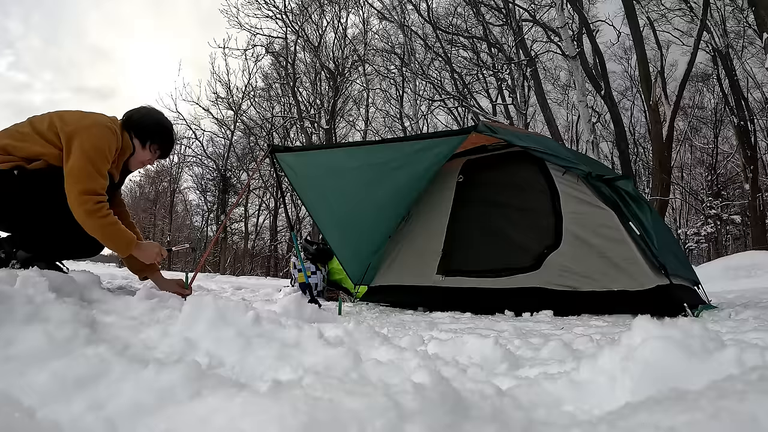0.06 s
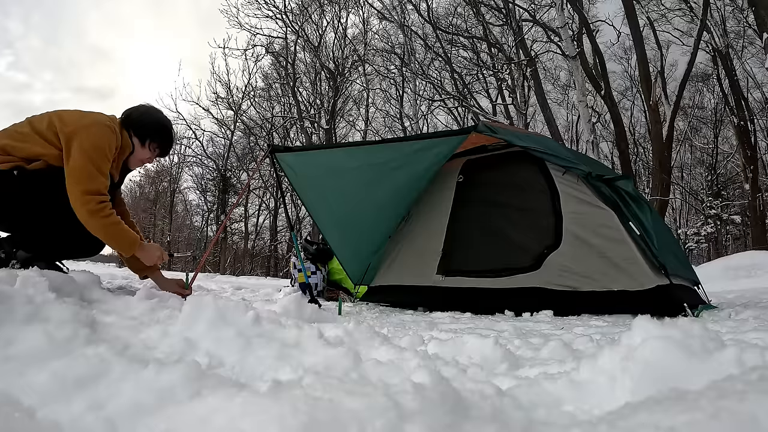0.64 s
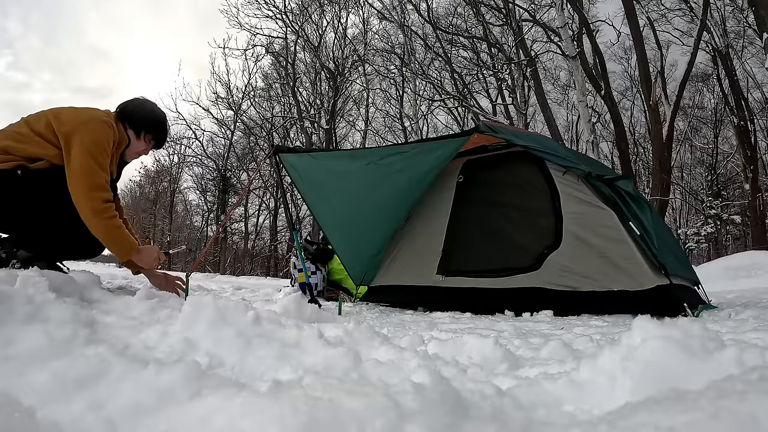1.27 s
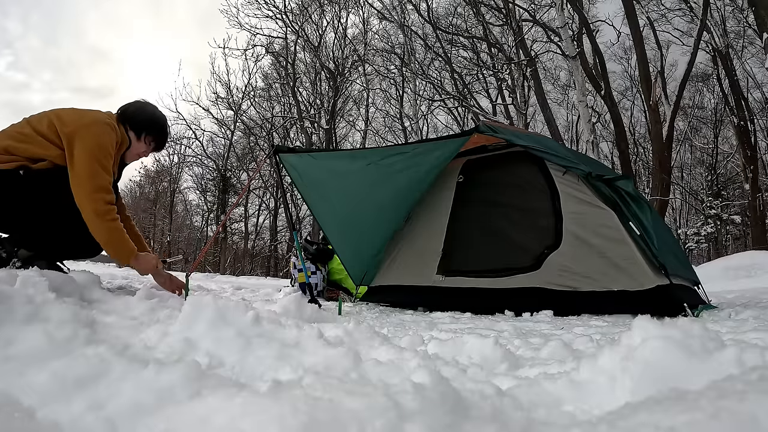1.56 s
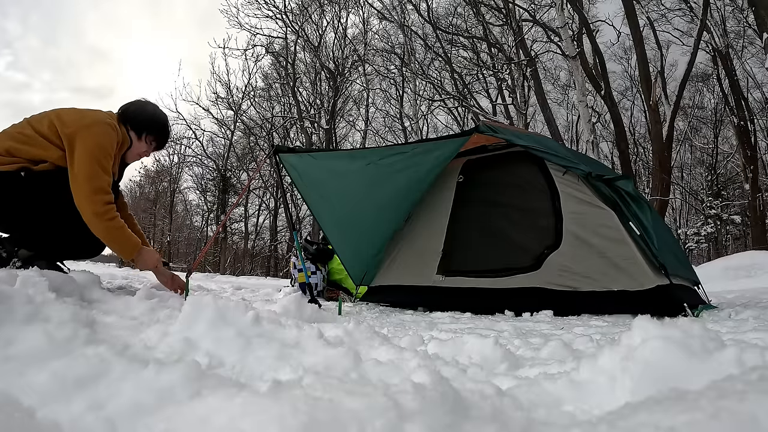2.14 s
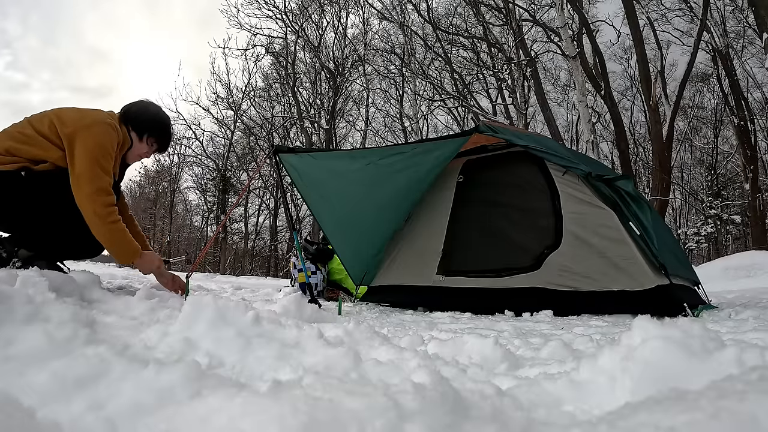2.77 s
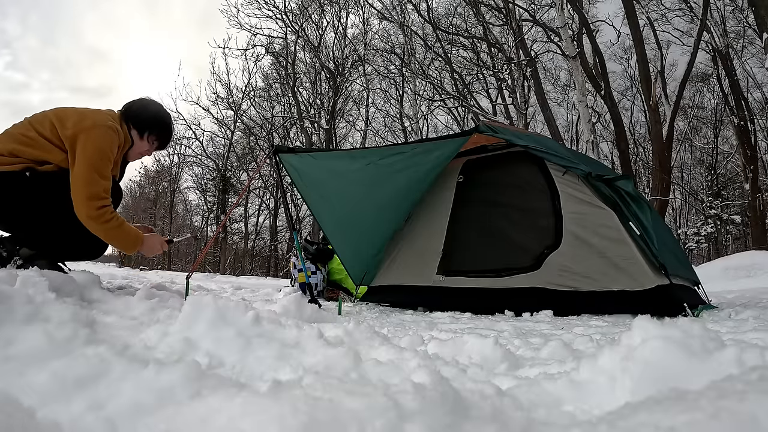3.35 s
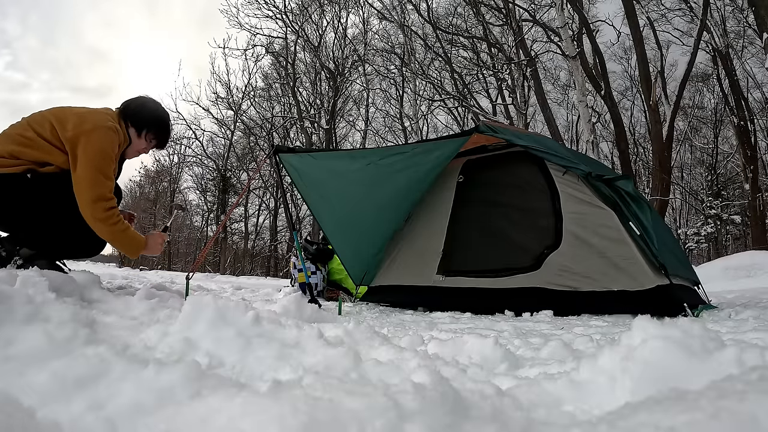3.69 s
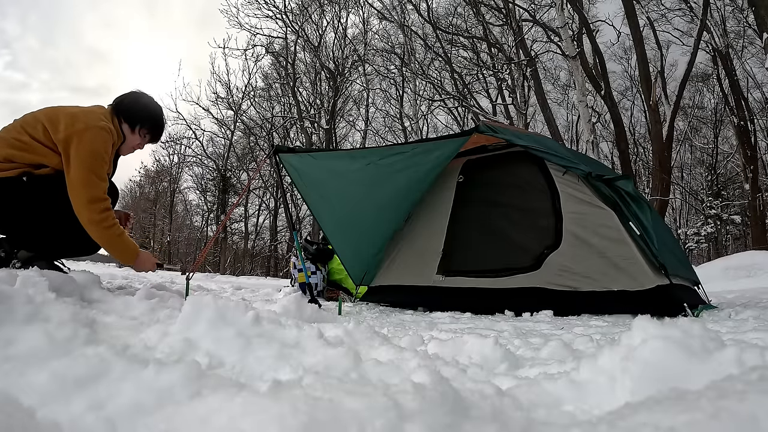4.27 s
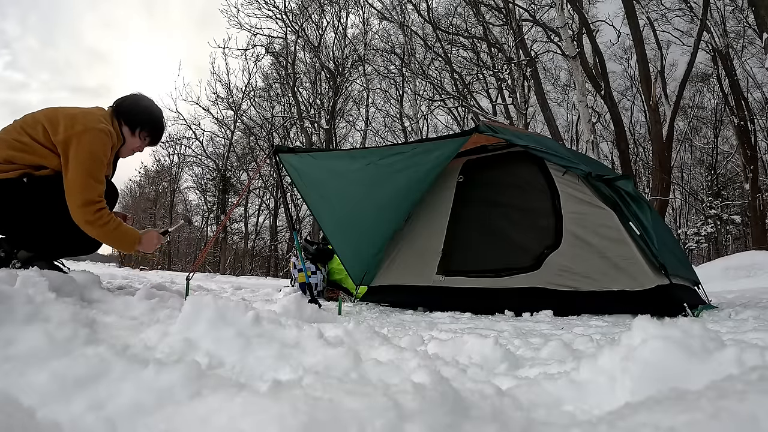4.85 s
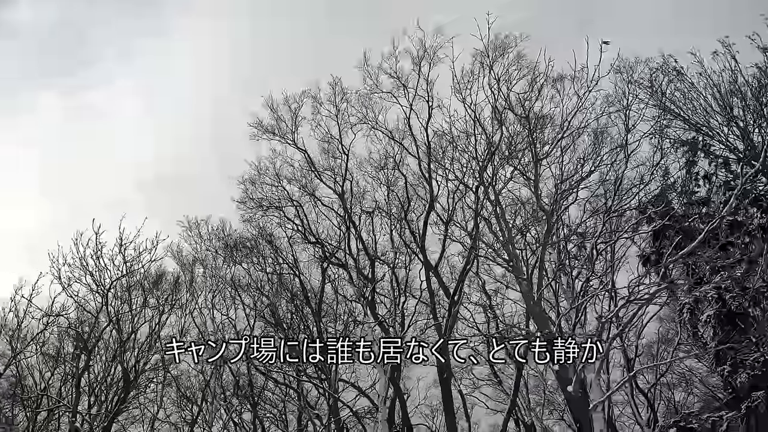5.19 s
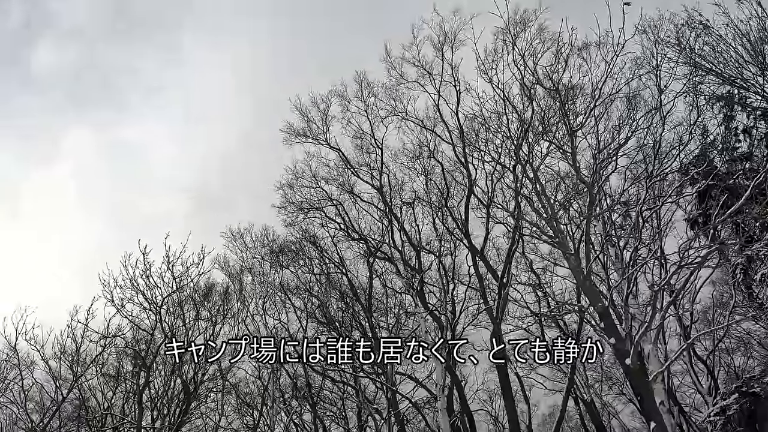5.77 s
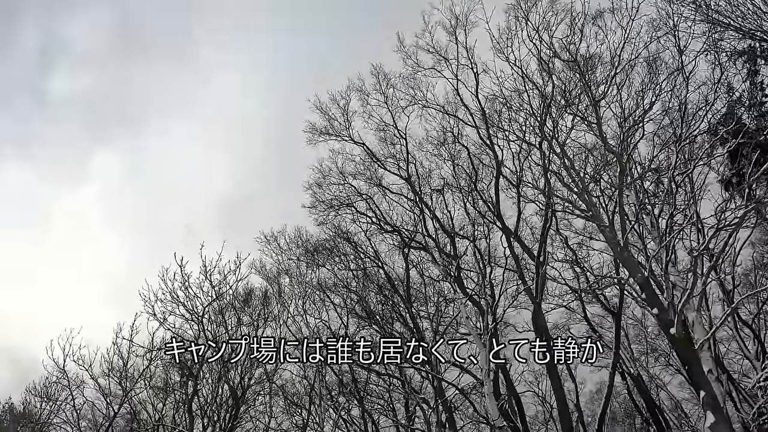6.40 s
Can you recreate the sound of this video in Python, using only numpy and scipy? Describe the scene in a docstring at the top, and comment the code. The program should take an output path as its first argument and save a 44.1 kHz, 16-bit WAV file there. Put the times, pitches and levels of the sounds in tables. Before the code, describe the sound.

A hammer drives a steel tent stake into frozen snow at the edge of a wood, in nearly still air. From the start to about 1.1 seconds come six quick, bright clinks, rising in pitch as the stake seats. After a short pause, fourteen more blows run from 1.7 to 4.8 seconds, about four a second. Each has a dull, hollow thud from the ground and a short echo off the trees; a few glance and rattle. Tiny ticks of snow crust and three faint bird chirps fall between roughly 3 and 4 seconds. At 5 seconds the sound changes abruptly to low wind rumble on the microphone, over a soft, far rush in the treetops. A distant crow gives one faint, hoarse call from about 5.2 to 5.7 seconds. Stronger gusts buffet the microphone from 6.3 seconds, peaking at the end.

```python
"""Tent stake in frozen snow

A steel stake takes twenty hammer blows: bright clinks, each with a dull thud from the ground.
The tent beside it throws every blow straight back; the edge of a bare wood answers a little later.
Then, among the trees, gusts rumble on the microphone and a far crow calls. Small birds chirp faintly."""
import sys
import numpy as np
from scipy import signal
from scipy.fft import rfft, irfft, next_fast_len
from scipy.io import wavfile
from scipy.ndimage import map_coordinates

SR = 44100
rng = np.random.default_rng(int(sys.argv[2]) if len(sys.argv) > 2 else 0)


def put_to_file(sound):
    """Save the sound as 16-bit audio at rate SR, in the file named by the first command-line argument."""
    columns = np.atleast_2d(sound).T  # one column per channel
    safe = np.clip(columns, -1, 1)
    whole_steps = np.round(safe * 32767)
    wavfile.write(sys.argv[1], SR, whole_steps.astype(np.int16))


N = 292515
MOVE_S = 5.02  # from the camp to the trees
BREEZE_DB = -39  # between gusts

# Hollow knock of hammer and ground. Each row: frequency in Hz, level in dB, T60 in seconds.
KNOCK_MODES = [(291, -21, 0.022), (540, 4, .018), (784, 4, 0.011), (950, 0, 0.0098), (1160, 0, 0.0188),
               (1482, -10, 0.037)]


def hammering():
    """Square blows crack, glancing ones rattle; each is heard directly, off the tent, then off the wood."""
    # Each row: start in seconds, strength in dB, glance from 0 to 1, then ring, clack and push in dB.
    blows = [(0.0802, 2, 0.37, -28, -36.5, -32.5), (0.2888, 1, 0.46, -23, -46.5, -34.5),
             (0.4843, 0.5, 0.22, -26, -36.5, -26), (0.679, 0.5, 0.25, -31.5, -31, -27),
             (0.8736, 1.5, 0.1, -24.5, -35, -26.5), (1.0827, -1, .2, -21.5, -31, -31.5),
             (1.6834, 2, 0.25, -23.5, -30, -60), (1.9337, 1.5, 0.31, -21.5, -31, -13),
             (2.1912, 1.5, 0.2, -24.5, -29.5, -26.5), (2.449, -4.5, 0.82, -20, -31.5, -28),
             (2.6719, 0.5, 0.27, -20, -30.5, -27), (2.8916, 1, 0.34, -28, -35, -28),
             (3.1214, 2, 0.17, -22, -52.5, -13), (3.3582, 1.5, 0.3, -24, -24, -15),
             (3.5919, -2.5, .95, -24, -11.5, -49.5), (3.8565, 2, 0.52, -23, -14.5, -33),
             (4.098, 1, .78, -13, -28, -26), (4.3442, 2, 0.2, -48, -21, -15),
             (4.5958, 1, .5, -24, -35, -39.5), (4.8372, 0, 0.42, -22, -34, -30)]
    # Modes of the stake. Each row: frequency in Hz, level in dB, T60 in seconds.
    steel_modes = [(8243, 1, .09), (9040, -2, .032), (7480, -10, .03), (4050, -22, .04), (12100, -18, .03)]
    seating_blows, glance_drop_hz = 5.6, 450
    tent_delay_s, tent_jitter_s, wood_db = .0067, .00012, -28
    direct, echoes = np.zeros((2, N)), np.zeros((2, N))
    t = np.arange(SR // 6) / SR
    for blow, (s, strength_db, glance, ring_db, clack_db, push_db) in enumerate(blows):
        # As the stake seats, its free length shortens and the pitch rises; firmer ice knocks harder.
        seated = min(blow / seating_blows, 1)
        crack_hz = 6240 + 2220 * seated - glance * glance_drop_hz
        aside_hz = 5900 + 1880 * seated - glance * glance_drop_hz  # towards tent and wood
        knock_db = -52 + 15 * seated ** 2 + .7652 * blow
        crack_gain = amp(strength_db - 1.5) * np.sqrt(1 - glance ** 2)
        rattle_db = strength_db - 4.5 + 20 * np.log10(glance)
        splinter_db = -17 + 1.6 * strength_db  # harder is brighter
        add(direct, s, amp(ring_db) * ring(steel_modes, t, scatter_db=1.5))  # too high and weak to echo
        add(direct, s, crack_gain * crack(t, crack_hz, splinter_db, touch_s=.00018))
        add(direct, s, clink(t, rattle_db, clack_db))
        add(direct, s, thud(t, knock_db, push_db))
        add(direct, s - .003, ground_shock(t, knock_db))
        tent_db = -11 - 3.5 * seated + 3.5 * glance
        off_tent = amp(tent_db) * crack(t, aside_hz, splinter_db=-13, touch_s=.0003)
        add(direct, s + tent_delay_s + tent_jitter_s * rng.standard_normal(), off_tent)
        for _ in range(2):  # two stands of trees, each catching its own part of the rattle
            outgoing = crack_gain * crack(t, aside_hz, splinter_db=-15.5, touch_s=.00018)
            outgoing += clink(t, rattle_db, clack_db + 3.5)
            add(echoes, s, amp(wood_db) * wood_edge(outgoing))
    return echoes + at_ports(direct)


def crack(t, hz, splinter_db, touch_s):
    """Steel meets steel for an instant: a few cycles, a higher splinter of tone, a spit of noise."""
    # Each row: frequency in Hz, noise density in dB.
    contact_spectrum = [(200, -31.5), (900, -10.5), (2600, -31), (4000, -13.5), (5000, -6.5), (6200, -1),
                        (8000, -3.5), (9600, 5), (10800, -14), (12300, -10), (14000, -26), (16000, -45.5)]
    touch = np.exp(-.5 * ((t - .0006) / touch_s) ** 2)
    tone = np.sin(2 * np.pi * hz * t) + amp(splinter_db) * np.sin(2 * np.pi * 12200 * t)
    spit = amp(-13.5) * swell(t, .00076) * spread(contact_spectrum, len(t), width=.3)
    return touch * tone + spit


def clink(t, rattle_db, clack_db):
    """The stake rattles in its icy hole, gives a hollow clack and chatters unevenly to rest."""
    # Each row: frequency in Hz, noise density in dB.
    rattle_spectrum = [(300, -17.5), (1800, -25.5), (2700, -28.5), (3900, -11), (5000, -11.5), (7000, -3),
                       (9100, 3), (10500, -6), (13000, -22), (15000, -24.5), (16500, -39)]
    chatter_spectrum = [(300, -15), (900, -14), (1700, -14), (2700, -20), (3800, -7.5), (5500, -4),
                        (7500, 0), (9300, 3), (10500, -5.5), (13000, -16.5), (16000, -33)]
    clack_spectrum = [(900, -14.5), (1550, -4), (1880, 1.5), (2300, -11.5), (3500, -17.5)]
    lump_step_s = .0013
    rattle = amp(-5) * decay(t, t60_s=.018) * spread(rattle_spectrum, len(t), width=.12)
    lumps_db = 5 * np.interp(t, np.arange(len(t)) * lump_step_s, rng.standard_normal(len(t)))
    chatter = amp(lumps_db - 11) * decay(t, t60_s=.062) * spread(chatter_spectrum, len(t), width=.4)
    clack = amp(clack_db - 9.5) * decay(t, t60_s=.013) * spread(clack_spectrum, len(t), width=.33)
    return amp(rattle_db) * (rattle + chatter) + clack


def thud(t, knock_db, push_db):
    """The frozen crust knocks, crunches and rebounds; the stake giving way pushes out one slow puff."""
    crunch_spectrum = [(40, -1), (170, 5), (300, -8), (700, -23.5), (1500, -20), (4000, -42.5)]
    rebound = -amp(-21.5) * ring([(183, .0072, .032)], t, scatter_db=1.2)
    push = amp(push_db) * (swell(t - .002, .0027) - .05 * swell(t - .006, .03))
    crunch = amp(-37.5) * decay(t, t60_s=.11) * spread(crunch_spectrum, len(t), width=.72)
    knock = amp(knock_db - 6.5) * ring(KNOCK_MODES, t, scatter_db=3)
    return rebound + push + crunch + knock


def ground_shock(t, knock_db):
    """The knock as it runs through hard ground, which carries it faster than air."""
    rise = 1 - np.exp(-t / .00082)
    return amp(knock_db - 9) * rise * ring(KNOCK_MODES, t, scatter_db=1.5)


def at_ports(direct):
    """Sound from the stake reaches the two microphone ports at slightly different level and phase."""
    # Each row: frequency in Hz, left over right in dB.
    balance_db = [(60, -4), (180, 0.5), (550, -3), (1650, -1), (4970, 0), (15000, 1.5)]
    # Each row: frequency in Hz, left phase lead in radians.
    lead_rad = [(0, 0), (2930, -0.6), (5510, -0.2), (10800, 0.0), (12000, 0.2), (16000, -0.1)]
    half = np.array([[.5], [-.5]])
    return filtered(
        direct, lambda hz: amp(half * along(balance_db, hz)) * np.exp(1j * half * along(lead_rad, hz)))


def wood_edge(blow):
    """Trees scatter a blow back: thick trunks answer briefly, treble lingers among fine twigs."""
    # Each row: frequency in Hz, echo gain in dB.
    trunk_colour = [(300, -20.5), (1000, -3), (1900, 12.5), (2700, 10.5), (3800, 10.5), (5400, 2.5),
                    (7000, -2.5), (8300, -6), (9100, -2), (10300, -8.5), (12000, -11), (15000, -16.5)]
    twig_colour = [(1500, -24), (3500, -9), (5500, 4), (7500, -0.5), (10000, -4.5), (14000, -12.5)]
    t = np.arange(SR // 2) / SR
    since_s = np.maximum(t - .04, 0)
    rise = 1 - np.exp(-since_s / .058)
    near_wash = .12 * swell(t, .028)  # nearby stems and lumpy snow
    trunk_groups = sum(np.exp(-((t - s) / .0015) ** 2) for s in (.052, .092, .161))
    trunks = (rise * decay(since_s, t60_s=.33) + near_wash) * (1 + .45 * trunk_groups)
    twigs = rise * decay(since_s, t60_s=.55)
    tail = 0
    for envelope, colour, db in ((trunks, trunk_colour, 0), (twigs, twig_colour, -3.5)):
        scatter = envelope * rng.standard_normal((2, len(t))) * np.exp(.5 * rng.standard_normal(len(t)))
        mid, side = scatter / np.linalg.norm(scatter[0])
        stereo = np.array([mid + .34 * side, mid - .4 * side])
        tail += filtered(stereo, lambda hz: amp(db + along(colour, hz)))
    return signal.fftconvolve(blow, tail, axes=1)


def crumbs():
    """Bits of crust snap under hand and knee with tiny dry ticks."""
    # Each row: start in seconds, level in dB, spectral peak in Hz.
    snaps = [(1.3555, -62, 3820), (1.398, -61, 7230), (1.4516, -50, 5270), (2.9194, -38, 7800),
             (3.644, -38, 5050), (3.6983, -46, 1870), (3.8862, -44, 1690)]
    out, t = np.zeros(N), np.arange(SR // 20) / SR
    for s, db, hz in snaps:
        spectrum = [(hz / 4, -24), (hz, 0), (hz * 2, -12), (hz * 4, -40)]
        add(out, s, amp(db - 4) * decay(t, t60_s=.025) * noise(spectrum, len(t)))
    return out


def gust_level_db():
    """Gusts rise, hold and fall over a steady breeze."""
    # Each row: start in seconds, length in seconds, level in dB.
    gusts = [(5.211, .16, -28), (5.428, 0.024, -27), (5.548, 0.054, -30), (6.307, 0.18, -21.5),
             (6.545, 0.1, -14.5)]
    rise_s, fall_s = .038, .061
    strength, t = np.zeros(N), np.arange(N) / SR
    for s, length_s, db in gusts:
        rise = np.clip((t - s) / rise_s, 0, 1)
        fall = np.exp(-np.maximum(t - s - length_s, 0) / fall_s)
        strength += amp(db) * rise * fall
    return 20 * np.log10(np.hypot(amp(BREEZE_DB), strength))


def buffeting(gust_db):
    """Wind rumbles on the microphone; faster air sheds smaller eddies, which grow more steeply."""
    # Each row: frequency in Hz, noise density in dB.
    rumble_spectrum = [(8.8, -31), (15, 10.5), (32, 12.5), (45, 2.5), (92, -10), (136, -35), (275, -55.5),
                       (345, -50), (700, -61), (910, -76), (1540, -120)]
    eddy_spectrum = [(30, -3.5), (60, 4.5), (110, 0.5), (170, -11.5), (300, -32.5), (700, -47), (1500, -87)]
    rumble = amp(gust_db + 2 * wobble(35)) * air(rumble_spectrum)
    eddies = amp(1.545 * gust_db) * air(eddy_spectrum)
    return rumble + eddies


def crow():
    """A distant crow draws out one hoarse call."""
    # Each row: time in seconds, pitch in Hz, level in dB.
    call = [(5.2, 1340, -77), (5.32, 1250, -60), (5.47, 1155, -55), (5.53, 1284, -63), (5.64, 1170, -60.5),
            (5.74, 1136, -73)]
    hz, db = curves(call)
    t = np.arange(N) / SR
    calling = (t > call[0][0]) & (t < call[-1][0])
    phase = 2 * np.pi * np.cumsum(hz * (1 + .021 * wobble(200))) / SR
    voice = np.sin(phase) + amp(-4) * np.sin(1.17 * phase)
    return calling * amp(db + 1.5 * wobble(50)) * voice


def small_birds():
    """Thin chirps, each an arch in pitch and level."""
    # Each row: start in seconds, length in seconds, top pitch in Hz, level in dB.
    chirps = [(3.03, .075, 4250, -53), (3.22, .06, 4150, -54), (3.91, .065, 4150, -52),
              (5.95, .07, 3500, -72), (6.5, .05, 1980, -63)]
    out = np.zeros(N)
    for s, length_s, top_hz, db in chirps:
        u = np.linspace(-1, 1, round(length_s * SR))
        phase = 2 * np.pi * np.cumsum(top_hz * (1 - .66 * u ** 2)) / SR
        add(out, s, amp(db) * np.sqrt(1 - u ** 2) * np.sin(phase))
    return out


def through_trees(calls):
    """Scatter from the trees smears the calls."""
    t = np.arange(SR // 3) / SR
    scatter = rng.standard_normal((2, len(t))) * decay(t, t60_s=.35)
    smeared = signal.fftconvolve(calls[None], scatter / np.linalg.norm(scatter[0]), axes=1)[:, :N]
    return .4 * calls + .8 * smeared


def treetops(gust_db):
    """Far roar of wind in the treetops, rising slowly and barely following the gusts."""
    # Each row: frequency in Hz, noise density in dB.
    roar_spectrum = [(71, -50.5), (120, -7.5), (213, 3.5), (314, -1), (355, -7), (535, -11), (949, -23.5),
                     (1120, -21), (1940, -38), (4590, -44.5), (7050, -43), (10800, -59), (16000, -71)]
    rise_db_per_s, gust_follow = 3, .037
    t = np.arange(N) / SR
    level_db = -49 + rise_db_per_s * (t - MOVE_S) + gust_follow * (gust_db - BREEZE_DB)
    return amp(level_db + .66 * wobble(10)) * air(roar_spectrum)


def camp_air():
    """Nearly still air: a drifting low rumble and a faint hiss."""
    # Each row: time in seconds, rumble level in dB.
    rumble_levels = [(0.0, -46), (0.6, -52), (1.41, -51), (1.75, -50), (4.21, -48), (4.6, -49.5),
                     (5.0, -45)]
    # Each row: frequency in Hz, noise density in dB.
    rumble_spectrum = [(12, -41.5), (20, 18), (42, 4), (117, -12), (160, -4.5), (295, -19.5), (401, -22.5),
                       (812, -33), (1370, -33.5), (1500, -31.5), (1950, -51.5), (3300, -120)]
    hiss_spectrum = [(300, -2), (1500, -10), (3000, -4.5), (7500, -0.5), (10000, -10.5), (13000, -10.5),
                     (16000, -25)]
    level_db, = curves(rumble_levels)
    rumble = amp(level_db + 3 + 2.5 * wobble(8)) * air(rumble_spectrum)
    return rumble + amp(-68) * air(hiss_spectrum)


def air(spectrum):
    """Stereo noise of rms 1, partly alike at the two ports."""
    # Each row: frequency in Hz, left-right correlation.
    likeness = [(30, .6), (60, .55), (180, .92), (550, .75), (1650, .5), (4970, .3), (15000, .16)]

    def mid_side_gains(hz):
        angle = np.arccos(along(likeness, hz)) / 2
        return np.array([np.cos(angle), np.sin(angle)])

    mid, side = filtered(noise(spectrum, (2, N)), mid_side_gains)
    return unit(np.array([mid + side, mid - side]))


def spread(spectrum, size, width):
    """Stereo noise: a shared part plus a part opposite at the two ports."""
    mid, side = noise(spectrum, (2, size))
    return np.array([mid + width * side, mid - width * side])


def noise(spectrum, shape):
    """Noise of rms 1, coloured by (Hz, dB) points."""
    return unit(filtered(rng.standard_normal(shape), lambda hz: amp(along(spectrum, hz))))


def ring(modes, t, scatter_db):
    """Damped (Hz, dB, T60 s) modes, struck at slightly new strengths each time."""
    chance_db = scatter_db * rng.standard_normal(len(modes))
    return sum(amp(db + extra_db) * decay(t, t60_s) * np.sin(2 * np.pi * hz * t)
               for (hz, db, t60_s), extra_db in zip(modes, chance_db))


def decay(t, t60_s):
    """A fall of 60 dB every t60_s."""
    return amp(-60 * t / t60_s)


def swell(t, peak_s):
    """A smooth bump that reaches 1 at peak_s and dies away."""
    u = np.maximum(t, 0) / peak_s
    return (u * np.exp(1 - u)) ** 2


def wobble(knots_per_s):
    """A smooth random curve."""
    knots = rng.standard_normal(int(N * knots_per_s / SR) + 4)
    return map_coordinates(knots, [np.arange(N) * knots_per_s / SR])


def curves(rows):
    """One value per sample for each column after the time."""
    s, *columns = np.transpose(rows)
    return [np.interp(np.arange(N) / SR, s, column) for column in columns]


def along(points, hz):
    """(Hz, value) points read on a log frequency axis."""
    knots_hz, values = np.transpose(points)
    return np.interp(np.log(hz + 1), np.log(knots_hz + 1), values)


def filtered(x, response):
    """Apply a gain given as a function of Hz."""
    n = x.shape[-1]
    padded = next_fast_len(n + SR // 10)
    return irfft(rfft(x, padded) * response(np.fft.rfftfreq(padded, 1 / SR)), padded)[..., :n]


def add(track, s, sound):
    """Mix a sound into a track at s seconds."""
    part = track[..., max(round(s * SR), 0):][..., :sound.shape[-1]]
    part += sound[..., :part.shape[-1]]


def amp(db):
    """Decibels to gain."""
    return 10 ** (np.asarray(db) / 20)


def unit(x):
    """Scale to rms 1."""
    return x / np.sqrt(np.mean(x ** 2) + 1e-20)


def scene():
    """The camp gives way abruptly to a spot among the trees; birds are heard in both."""
    crossfade_s = .005
    still_air = camp_air()
    gust_db = gust_level_db()
    trees = treetops(gust_db) + buffeting(gust_db)
    camp = hammering() + crumbs() + still_air
    birds = through_trees(crow() + small_birds())
    moved = np.clip((np.arange(N) / SR - MOVE_S) / crossfade_s + .5, 0, 1)
    return (1 - moved) * camp + moved * trees + birds


def record(dry):
    """Round off the highest peaks, then cut the top treble steeply."""
    top_hz = 16100
    rounded = dry / (1 + np.abs(dry) ** 6) ** (1 / 6)
    return signal.sosfilt(signal.butter(30, top_hz, fs=SR, output="sos"), rounded)


dry = scene()
out = record(dry)
put_to_file(out)
```